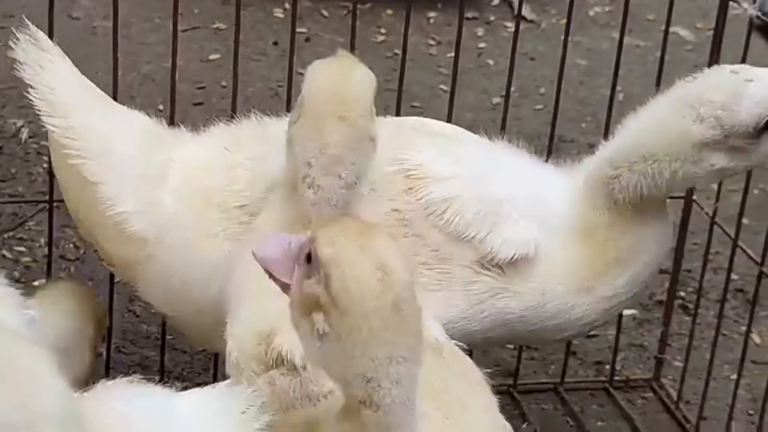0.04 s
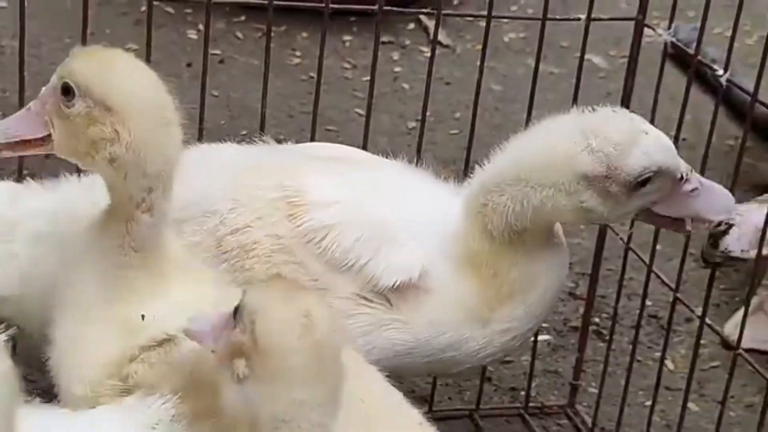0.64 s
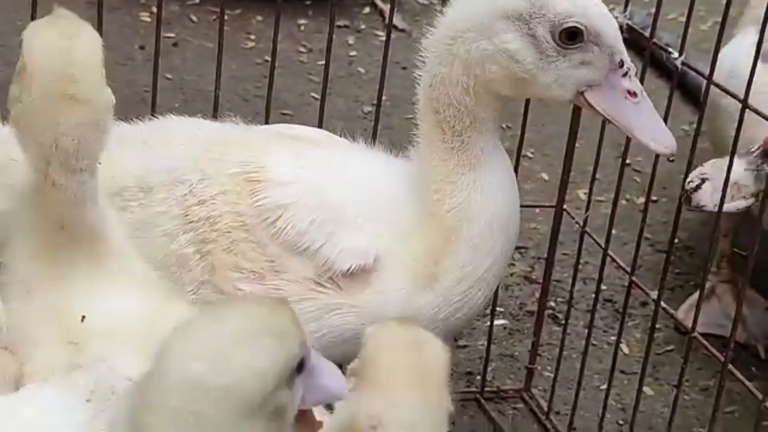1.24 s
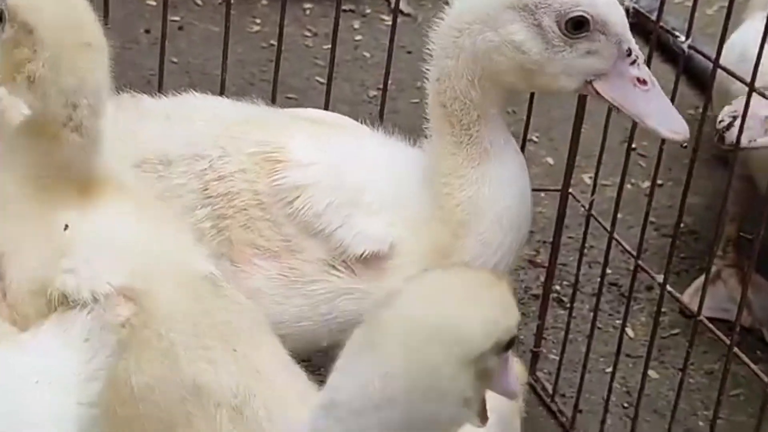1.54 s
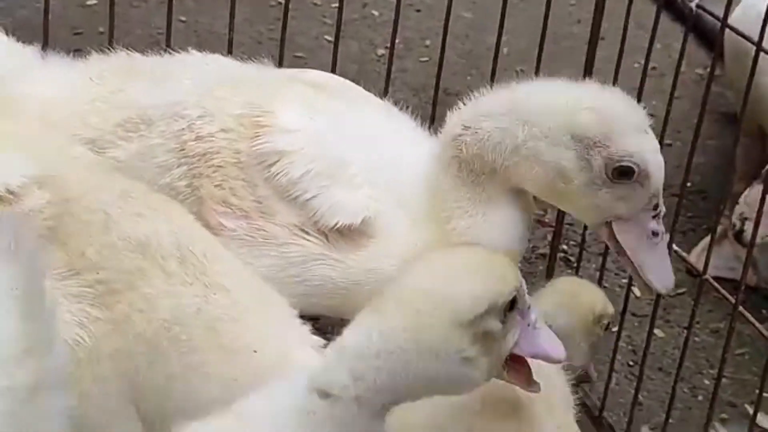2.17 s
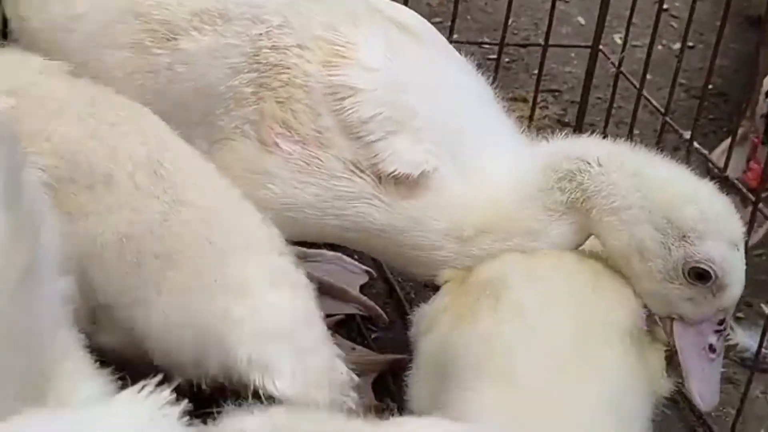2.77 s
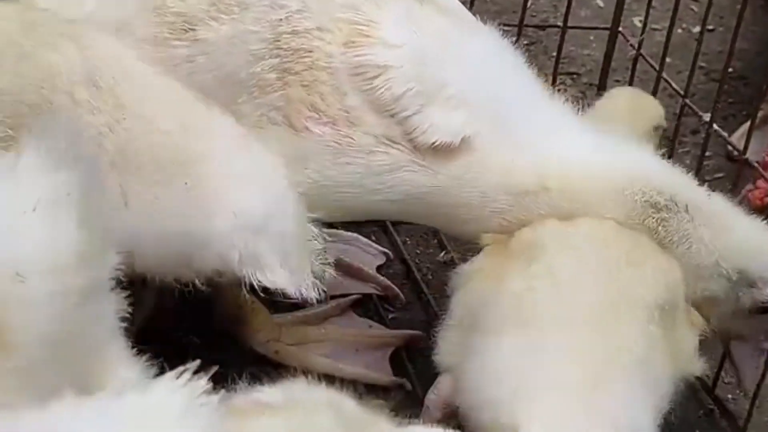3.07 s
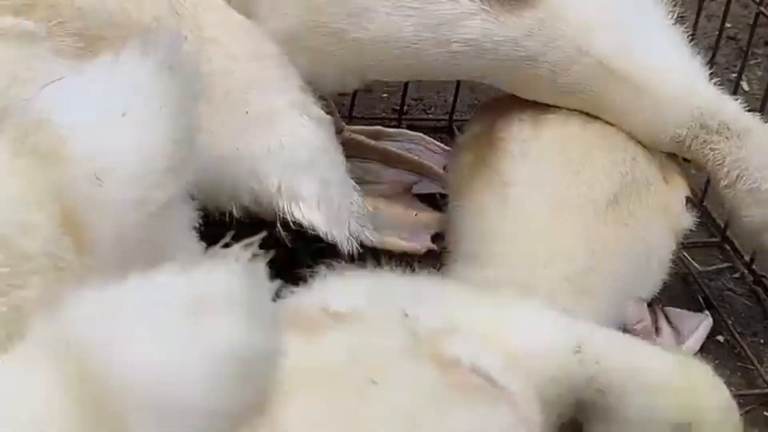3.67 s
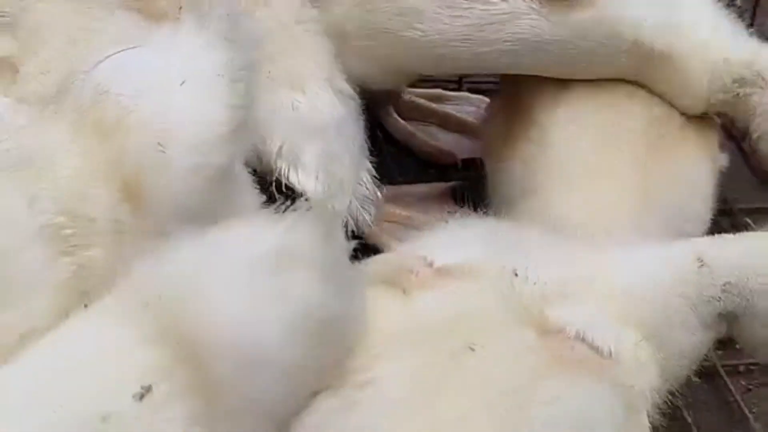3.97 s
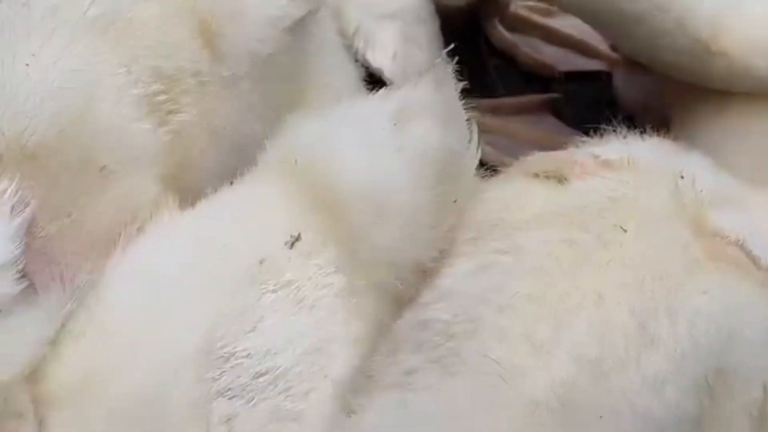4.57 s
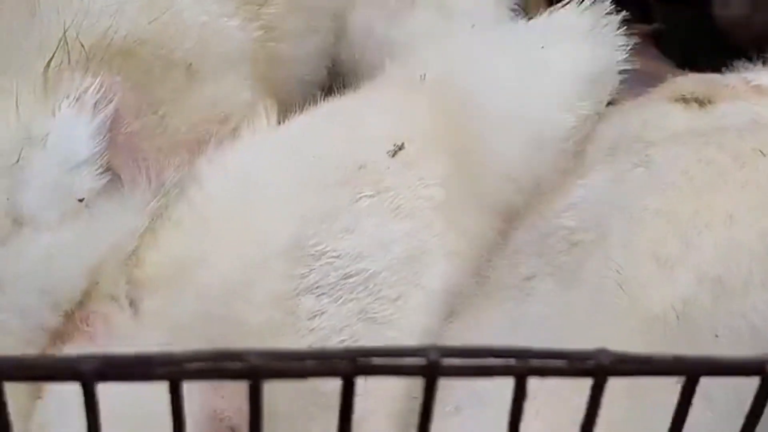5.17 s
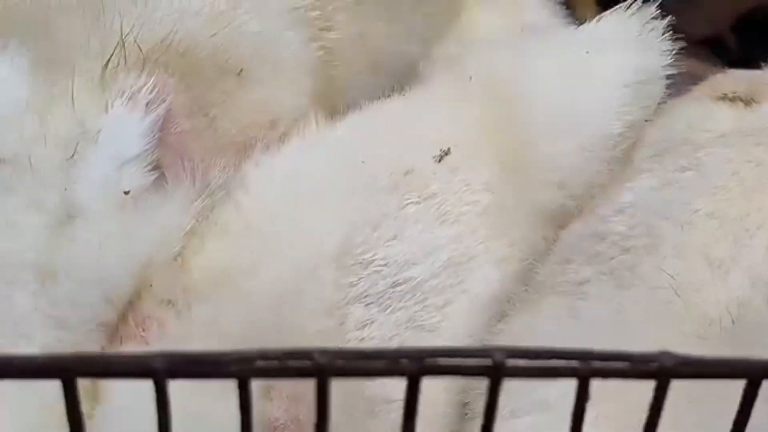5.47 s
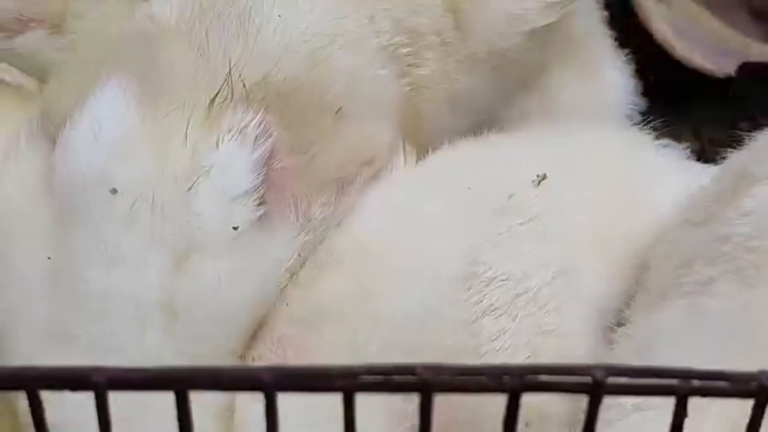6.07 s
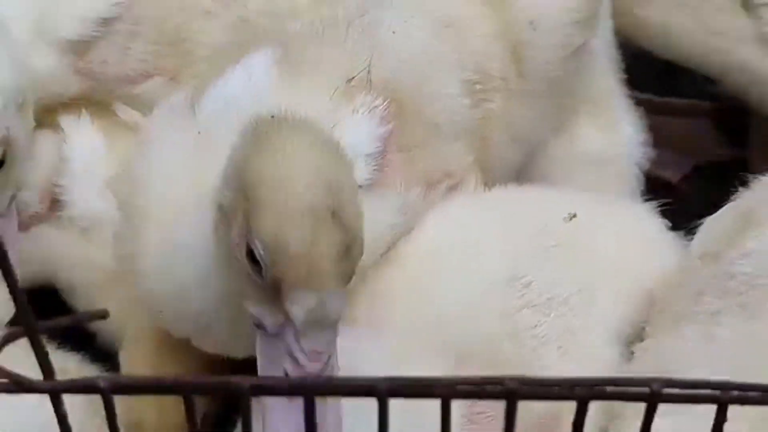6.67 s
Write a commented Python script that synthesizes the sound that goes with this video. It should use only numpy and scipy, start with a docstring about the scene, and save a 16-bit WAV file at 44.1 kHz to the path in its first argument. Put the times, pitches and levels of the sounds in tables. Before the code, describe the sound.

Heard from just above a cage in a yard, young ducklings keep up short, high, overlapping chirps, with sharp peeps standing out near the start and again past the middle. Bills and claws tick on the wires, feathers brush softly, and grown birds coo, cluck and quack quietly. A far chick cheeps through the second half. A distant engine thuds low and swells with a closing quack.

```python
"""A wire cage of ducklings, heard from just above. Soft arched chirps and twitters start at once, over far
chatter, coos, quacks, ticking wires, brushing feathers and the thud of an idling engine. Around 1 s come a
throaty rasp and two loud peeps, each two syrinx membranes beating together; at 2 s, a thin squeal. From 3 s
a far chick cheeps steadily. Around 5 s three more peeps and a rattling squawk burst out, and the scene ends
on a grown duck's quack as the engine swells."""
import sys
import numpy as np
from scipy import signal
from scipy.fft import rfft, irfft, next_fast_len
from scipy.io import wavfile
from scipy.ndimage import uniform_filter1d, minimum_filter1d, map_coordinates

SR = 44100
rng = np.random.default_rng(int(sys.argv[2]) if len(sys.argv) > 2 else 0)


def output_pcm(signal):
    """Save a mono or channel-first signal as 16-bit PCM at the path in sys.argv[1].

    Samples are clipped to [-1, 1] before scaling.
    """
    pcm = np.clip(np.atleast_2d(signal).T, -1, 1) * 32767
    wavfile.write(sys.argv[1], SR, np.round(pcm).astype(np.int16))


N = 305172

TROUGH_HZ = 2390  # a twitter's pitch between notes


def soft_calls(open_db_per_hz=.03, ragged_db=3, wander=.02, split_hz=3200):
    """Near ducklings, as direct sound and echo send; a higher call opens the bill and is brighter."""
    # Single chirps. Each row: start in seconds, length in seconds, top pitch in Hz, level in dB,
    # left over right in dB, roughness 0-1.
    chirp_cues = [(0.161, 0.047, 3160, -29, -1, 0), (.434, 0.055, 2820, -30.5, 1, 0.13),
                  (.476, .042, 3130, -24.5, 1, .2), (.587, .043, 2670, -33, -1, 0.07),
                  (1.034, .046, 2920, -24.5, -2, .12), (1.075, .07, 2560, -26, 1, .2),
                  (1.094, .04, 2960, -26.5, 0, .16), (1.145, .025, 2430, -25, -2, .15),
                  (1.157, 0.035, 2950, -26.5, -2, 0.22), (1.924, .035, 2686, -24, -7.5, .03),
                  (1.971, .031, 2804, -20, -6, .08), (2.183, 0.039, 3060, -34.5, 3, 0.39),
                  (2.45, 0.031, 2585, -37, -4, 0.18), (2.705, .06, 3060, -35, 0.5, 0.05),
                  (3.306, 0.026, 2530, -34, -17, 0.08), (3.579, 0.079, 2396, -37.5, -8, 0.17),
                  (4.197, 0.088, 3250, -34.5, 2, 0.05), (4.75, .044, 2734, -30, 1, 0.43),
                  (4.792, .066, 3316, -28, -4.5, 0.16), (5.056, 0.07, 2930, -36, 4, 0.2),
                  (5.399, 0.073, 2756, -33, 6, 0.6), (5.466, 0.042, 2460, -22, -3, .05),
                  (5.831, .033, 2820, -28, -3, .06), (5.858, 0.065, 3350, -29, -8, 0.13),
                  (6.481, .022, 2660, -36, 1, 0.2)]
    # Runs of slurred notes. Each row: start, length and note spacing in seconds, top pitch in Hz, level
    # in dB, left over right in dB, roughness 0-1, dip between notes in dB, growth over the run in dB.
    twitter_cues = [(-.013, 0.09, .043, 2780, -31, -4, 0.02, 16, -2),
                    (0.689, 0.1, .05, 3036, -27.5, 2.5, 0.34, 5, 9.5),
                    (2.475, .1, .05, 2802, -21.5, -9, 0.05, 3.5, 2.5),
                    (2.745, 0.1, .05, 2790, -41.5, -1, 0.3, -3, -4),
                    (3.619, .145, .044, 2930, -28.5, -6.5, 0.3, 4, -3),
                    (3.953, 0.125, .05, 2700, -31, 2.5, 0.35, 3.5, -2),
                    (5.483, 0.091, .042, 3280, -27, -4, 0.38, 7, -12.5)]
    # Falling whistles. Each row: start and length in seconds, level in dB, left over right in dB,
    # roughness 0-1.
    slide_cues = [(0.124, 0.04, -32.5, -4.5, .2), (0.419, 0.049, -32, -3.5, .12),
                  (0.713, 0.034, -31, -0.5, .24), (1.04, .115, -35.5, -3.5, .4)]
    calls = [chirp(*row) for row in chirp_cues] + [twitter(*row) for row in twitter_cues]
    calls += [slide(*row) for row in slide_cues]
    direct, send = np.zeros((2, 2, N))
    for start, hz, level, pan_db, rough in calls:
        n = len(hz)
        bright_db = -17 + open_db_per_hz * (np.clip(hz.max(), 2700, 3200) - 2700)
        bright_db += np.clip(pan_db, -8, 4)  # the birds on the left face the microphone
        level = level * evened(gain_of(ragged_db * np.sqrt(rough) * wobble(n, 110)))
        hz = hz * (1 + wander * np.sqrt(rough) * wobble(n, 89.6))
        tone = placed(level * (whistle(hz, rough) + gain_of(-21) * rough * breath(n)), pan_db)
        splits = hz.max() > split_hz and hz.min() < TROUGH_HZ  # a wide climb brings out subharmonics
        grit = rasping_edge(hz, rough + .026, half_db=5 if splits else -8, breath_db=-7)
        grit = placed(level * gain_of(bright_db) * grit, pan_db)
        add(direct, start, tone + gain_of(-4) * grit)
        add(send, start, tone * (.35 + 1.97 * rough) + gain_of(-1) * grit)
    return direct, send


def chirp(start, length, top_hz, db, pan_db, rough, rest_hz=1950, skew=1.15, db_per_hz=.008):
    """Curves for one arch of pitch that climbs slowly and drops fast, loudest at the top."""
    u = np.linspace(0, 1, int(length * SR)) ** skew
    hz = rest_hz + (top_hz - rest_hz) * 4 * u * (1 - u)
    level = evened(gain_of(db_per_hz * (hz - top_hz)) * swell(len(u), share=.39))
    return start, hz, gain_of(db) * level, pan_db, rough


def twitter(start, length, note_s, top_hz, db, pan_db, rough, dip_db, growth_db):
    """Curves for a slurred run: pitch and level swing once a note."""
    t = np.arange(int(length * SR)) / SR
    trough = (1 + np.sin(2 * np.pi * t / note_s)) / 2
    level = evened(gain_of(growth_db * t / length - dip_db * trough) * swell(len(t), share=.18))
    return start, top_hz + (TROUGH_HZ - top_hz) * trough, gain_of(db) * level, pan_db, rough


def slide(start, length, db, pan_db, rough):
    """Curves for a short whistle: the high side of the syrinx slides down by itself."""
    hz = arch(length, first=3850, middle=3620, last=3400)
    return start, hz, gain_of(db) * swell(len(hz), share=.33), pan_db, rough


def peeps(scoop_hz=250, drop_hz=810, bend_share=.0837, extra_gap_hz=1000, close_s=.015, high_weight=1.3):
    """Two membranes beat together; sharing one airflow, they make clusters of overtones and sum tones."""
    # Loud peeps. Each row: start and length in seconds; low voice's pitch, its glide and the last gap
    # between voices in Hz; low voice's crest as a share of the length; then in dB the low voice,
    # high voice, left over right, rasp at full voice and upper overtone trim.
    cues = [(0.964, 0.08, 2730, 90, 330, 0.42, -14.5, -24, -6.5, -32, -3),
            (1.212, 0.087, 2720, 230, 430, 0.53, -9.5, -19, -6.5, -25.5, 1),
            (4.668, 0.09, 2750, 40, 340, 0.5, -9, -20, -6, -35, -13),
            (4.9, .08, 2860, -800, 590, 0.52, -15, -17, -6.5, -25, 0),
            (5.336, 0.084, 2860, -300, 340, 0.52, -3.5, -14, -3.5, -37, -11)]
    # Overtones of both voices together. Each row: multiple, level in dB.
    partials = [(2, -24), (3, -31), (4, -37)]
    out = np.zeros((2, N))
    for start, length, pitch, glide, gap, crest_at, low_top, high_top, pan_db, grit_db, trim_db in cues:
        u = np.linspace(0, 1, int(length * SR))
        scoop = scoop_hz * np.exp(-u / bend_share)
        collapse = drop_hz * np.exp((u - 1) / bend_share)  # the air gives out
        low_hz = pitch + glide * (u - .5) - collapse - scoop
        high_hz = low_hz + gap + extra_gap_hz * np.exp(-u * length / close_s)
        low_db = low_top + crest(u, crest_at, rise_db=23, fall_db=22.5)
        high_db = high_top + crest(u, .51, rise_db=20, fall_db=21)
        low = gain_of(low_db) * whistle(low_hz, rough=.06)
        high = gain_of(high_db) * whistle(high_hz, rough=.11)
        strength = np.hypot(gain_of(low_db), high_weight * gain_of(high_db))
        both = signal.hilbert(low + high_weight * high) / strength
        overtones = sum(gain_of(db + trim_db * (k > 2)) * evened((both ** round(k)).real)
                        for k, db in partials)
        grit = gain_of(grit_db + .57 * low_db) * rasping_edge(low_hz, rough=.5, half_db=-2)
        voice = low + high + strength * overtones + grit
        add(out, start, placed(voice, pan_db) * swell(len(u), share=.18))
    return out


def whistle(hz, rough, overtones_db=(), flutter_hz=420, jitter=.1, shimmer=.97):
    """A syrinx membrane: nearly a sine; when rough, its pitch and strength flutter."""
    phase = 2 * np.pi * cycles(hz, jitter * rough, flutter_hz)
    tone = np.sin(phase) + sum(gain_of(db) * np.sin(k * phase) for k, db in enumerate(overtones_db, 2))
    return evened(tone * (1 + shimmer * rough * wobble(len(hz), flutter_hz)))


def rasping_edge(hz, rough, half_db=-6, breath_db=0):
    """The grit on a call: roughness dissolves its overtones into half harmonics and sputtering hiss."""
    # The bill's colour on overtones and breath. Each row: frequency in Hz, gain in dB.
    bill_eq = [(1300, -8), (3000, 7.5), (4600, -3), (5400, -2), (6300, 5), (7200, -2), (8300, -10),
               (10500, -4.5), (15000, -14)]
    # The hiss of a hoarse call. Each row: frequency in Hz, gain in dB.
    hiss_eq = [(2000, -29), (4400, -13), (6000, 6.5), (7500, 1), (10500, -6.5), (15000, -22)]
    n, hoarseness = len(hz), np.sqrt(np.clip(rough, 0, 1))
    phase = 2 * np.pi * cycles(hz, .04 * rough, 600)
    overtones = np.sin(2 * phase) + gain_of(-7) * np.sin(3 * phase) + gain_of(-8) * np.sin(4 * phase)
    halves = evened(gain_of(4) * np.sin(phase / 2) + np.sin(1.5 * phase) + np.sin(2.5 * phase))
    hiss = gain_of(-5) * evened(noise(n, hiss_eq) * gain_of(5.7 * wobble(n, 380)))
    voiced = evened(overtones) * (1 - hoarseness / 4) / np.sqrt(2)
    voiced += hoarseness * gain_of(half_db) * halves
    return body_bounce(colour(voiced + gain_of(breath_db) * breath(n), bill_eq) + hoarseness * hiss)


def breath(n):
    """Air rushing through a small open bill."""
    return evened(noise(n, [(500, -9), (1600, 6.5), (2700, 18.5), (4300, -14), (6000, -11),
                            (8500, -23), (11000, -25), (15000, -7)]))


def rasps():
    """Hoarse pulses ring a duckling's small throat."""
    # Rasps. Each row: start and length in seconds, nominal pulses a second, throat tuning factor,
    # level in dB, roughness 0-1.
    cues = [(.455, 0.059, 520, 0.93, -38.5, 0.53), (.715, 0.11, 380, 0.51, -36, 0.25),
            (2.135, 0.073, 270, 1.1, -48.5, 0.8), (6.098, 0.069, 490, 1.32, -36.5, 0.75)]
    # The small throat's resonances before tuning. Each row: centre in Hz, width in Hz, gain in dB.
    throat = [(1940, 190, -6.5), (3220, 550, 7.5), (3520, 210, 4.5), (6500, 730, -4.5), (9900, 1400, -10)]
    return hoarse_voice(cues, throat)


def hoarse_voice(calls, throat, jitter=.14, puff_share=.3, mouth_shut=.83):
    """Uneven pulses and puffs of air ring a throat, whose resonances rise and fall with the mouth."""
    out = np.zeros(N)
    for start, length, rate, tuning, db, rough in calls:
        hz = rate * arch(length, .86, 1.02, 1)
        n = len(hz)
        turns = cycles(hz, jitter * rough, 150)
        pulses = evened(np.diff(np.floor(turns), prepend=0) - hz / SR)
        puffs = evened(np.exp(-(turns % 1) / puff_share) * rng.standard_normal(n))
        drive = (1 - rough) * pulses + rough * puffs
        voice = np.zeros(n)
        for centre, width, mode_db in throat:
            centre_hz = centre * tuning * arch(length, mouth_shut, 1.02, mouth_shut)
            width_hz = 2 * width * tuning
            voice += gain_of(mode_db) * resonate(resonate(drive, centre_hz, width_hz), centre_hz, width_hz)
        voice = evened(voice * gain_of(2.5 * wobble(n, 40)))
        add(out, start, gain_of(db) * voice * swell(n, share=1))
    return out


def squawk(rattle_hz=300, ring_share=.4, breath_db=-13):
    """A strained voice rich in overtones, chopped by an uneven rattle in the throat."""
    # One squawk: start and length in seconds, top pitch in Hz, level in dB.
    start, length, top_hz, db = (5.09, .118, 835, -26.5)
    # The strained throat's colour. Each row: frequency in Hz, gain in dB.
    throat_eq = [(900, -36), (1700, -12), (2500, -8), (3400, 5), (4300, -12), (7000, -18), (10500, -14),
                 (14000, -33)]
    hz = top_hz * arch(length, .9, 1, .9)
    n, out = len(hz), np.zeros(N)
    phase = 2 * np.pi * cycles(hz, .02, 400)
    rattle = np.exp(-(cycles(np.full(n, rattle_hz), .3, 200) % 1) / ring_share)
    voice = evened(sum(np.cos(k * phase) for k in range(1, 18)))
    voice += gain_of(breath_db) * rng.standard_normal(n)
    add(out, start, gain_of(db) * evened(colour(voice * rattle, throat_eq)) * swell(n, share=.75))
    return out


def squeal():
    """A thin, strained, slowly rising call with a few strong overtones."""
    # One squeal: start and length in seconds, first and last pitch in Hz, level in dB.
    start, length, first_hz, last_hz, db = (2.01, 0.18, 735, 785, -39.5)
    # Its overtones. Each row: multiple, level in dB.
    partials = [(3, 4), (4, 0.5), (6, 1), (8, -5), (11, -20), (13, -15)]
    n, out = int(length * SR), np.zeros(N)
    phase = 2 * np.pi * cycles(np.linspace(first_hz, last_hz, n), .016, 310)
    voice = evened(sum(gain_of(tone_db) * np.sin(round(k) * phase) for k, tone_db in partials))
    add(out, start, gain_of(db + 3 * wobble(n, 60)) * swell(n, share=1) * voice)
    return out


def wire_ticks(knock_s=.007, clatter_db=-9):
    """Bills and claws hit the wires: a bright tick and a short knock."""
    # Hits. Each row: start in seconds, level in dB, knock against tick in dB, brightest frequency in Hz,
    # tick decay in seconds.
    cues = [(.134, -22, -14, 4200, 0.0019), (.601, -39, -26, 10000, 0.0051),
            (1.404, -29.5, -9, 8450, 0.0025), (1.641, -39, -20, 5500, 0.0026),
            (4.132, -39, 8.5, 4500, 0.003), (4.168, -40, -13, 8000, 0.0033), (4.545, -39, 10, 4000, .004),
            (5.944, -39, -15, 8000, .005), (6.062, -34.5, -2, 4000, .003),
            (6.281, -36.5, -25, 4970, 0.0079), (6.448, -33, -14, 10000, 0.0048),
            (6.801, -29, -6, 7600, .005)]
    out, t = np.zeros(N), np.arange(SR // 10) / SR
    for start, db, knock_db, bright_hz, tick_s in cues:
        clatter = noise(len(t), [(800, -35), (2500, .5), (15000, 0)])
        ring = resonate(clatter, np.full(len(t), bright_hz), .58 * bright_hz)
        tick = evened(ring + gain_of(clatter_db) * clatter) * np.exp(-t / tick_s)
        body = noise(len(t), [(200, -30), (500, 3.5), (1100, 3.5), (2500, -24), (8000, -57)])
        knock = gain_of(knock_db) * evened(body) * np.exp(-t / knock_s) / 2
        add(out, start, gain_of(db) * (tick + knock))
    return out


def rustle(scratches_per_s=120, scratch_s=.0048, scratch_db=-61, spread_db=4, grain_db=4):
    """Feet scratch the wires faintly at chance moments; feathers brush them in grainy strokes."""
    # Feather strokes. Each row: start and length in seconds, level in dB.
    strokes = [(1.088, 0.075, -43.5), (2.137, 0.044, -43), (3.38, .16, -54), (5.418, 0.18, -43.5),
               (5.853, 0.085, -46.5), (6.187, 0.06, -47)]
    # Colour of feet and feathers on wire. Each row: frequency in Hz, gain in dB.
    rustle_eq = [(400, -20), (1500, -11), (4000, -6), (7000, 1), (10500, -1.5), (15000, -6.5)]
    sizes = gain_of(spread_db * np.minimum(rng.exponential(1, N), 3))
    scratches = sizes * (rng.random(N) < scratches_per_s / SR)
    decay = np.exp(-1 / (scratch_s * SR))
    level = gain_of(scratch_db) * evened(signal.lfilter([1], [1, -decay], scratches))
    for start, length, db in strokes:
        n = int(length * SR)
        add(level, start, gain_of(db) * evened(swell(n, share=.62) * gain_of(grain_db * wobble(n, 190))))
    return level * evened(noise((2, N), rustle_eq))


def chick_cheeps(length=.1, first_hz=5200, bend=1.8):
    """The far chick's thin whistle starts high, falls fast and levels off."""
    # Cheeps. Each row: start in seconds, last pitch in Hz, level in dB.
    cues = [(1.385, 3850, -35.5), (3.105, 3600, -40), (3.397, 3600, -37), (3.889, 3750, -36),
            (4.215, 3950, -35), (4.791, 3900, -33.5), (5.195, 3800, -36.5), (5.578, 3950, -35),
            (5.864, 3950, -33.5), (6.095, 3950, -33)]
    out, u = np.zeros(N), np.linspace(0, 1, int(length * SR))
    for start, last_hz, db in cues:
        hz = last_hz + (first_hz - last_hz) * (1 - u) ** bend
        add(out, start, gain_of(db) * whistle(hz, rough=.27) * swell(len(hz), share=.8))
    return out


def clucks_and_quacks(cluck_hz=403, quack_hz=190, quack_rough=.8):
    """Grown birds pulse the same kind of big throat: fast for a cluck, slowly for a hoarse quack."""
    # Clucks. Each row: start and length in seconds, throat tuning factor, level in dB, roughness 0-1.
    cluck_cues = [(0.716, 0.082, 1, -47, .38), (2.125, 0.065, 1.44, -44.5, 0.71),
                  (2.2, 0.1, 1.5, -42, 0.65), (4.52, 0.053, 1.12, -35.5, 0.25),
                  (6.027, .045, 1.12, -35.5, 0.07), (6.133, .085, 1.12, -38.5, 0.17)]
    # Quacks. Each row: start and length in seconds, throat tuning factor, level in dB.
    quack_cues = [(-.1, 0.68, 0.63, -56.5), (1.341, 0.29, 0.85, -43.5), (4.41, 0.19, 1.2, -46),
                  (4.519, 0.21, .92, -43.5), (5.6, .25, 0.542, -55.5), (6.695, 0.12, 0.95, -49),
                  (6.81, .13, 1.195, -35.5)]
    # The big throat's resonances before tuning. Each row: centre in Hz, width in Hz, gain in dB.
    throat = [(800, 195, 9), (1205, 159, 6.5), (1493, 116, -4.5), (2480, 320, -13.5)]
    clucks = [(start, length, cluck_hz, *rest) for start, length, *rest in cluck_cues]
    quacks = [(start, length, quack_hz, *rest, quack_rough) for start, length, *rest in quack_cues]
    return hoarse_voice(clucks + quacks, throat)


def coos():
    """Grown birds hoot softly on a shallow arch of pitch."""
    # Coos. Each row: start and length in seconds, nominal pitch in Hz, level in dB.
    cues = [(-.02, 0.098, 1027, -34), (0.449, 0.11, 1023, -36), (2.77, 0.14, 1480, -53),
            (2.928, 0.056, 960, -46), (3.011, 0.046, 984, -44.5), (3.78, 0.077, 1010, -45)]
    out = np.zeros(N)
    for start, length, pitch, db in cues:
        hz = pitch * arch(length, .93, .98, .919)
        voice = whistle(hz, rough=.31, overtones_db=[-26], flutter_hz=130)
        add(out, start, gain_of(db) * voice * swell(len(hz), share=.55))
    return out


def far_flock():
    """Ducklings farther back: bouts of chatter over faint, unbroken peeping."""
    # Bouts. Each row: start and length in seconds, central pitch in Hz, level in dB.
    bouts = [(0.048, .12, 2410, -33.5), (0.198, .14, 2646, -41.5), (.8, 0.18, 2450, -36),
             (1.281, .11, 2743, -32), (1.4, .17, 2556, -41), (1.674, 0.23, 2537, -37),
             (1.989, 0.055, 2150, -38), (2.218, .08, 2393, -41), (2.769, 0.091, 2552, -41.5),
             (3.018, .07, 2696, -39.5), (3.17, .18, 2454, -39), (3.76, .19, 2600, -34.5),
             (4.487, 0.083, 2540, -37), (5.745, .07, 2450, -37.5), (5.909, 0.21, 2438, -39.5),
             (6.195, 0.075, 2700, -36.5), (6.43, 0.17, 2595, -38), (6.6, .15, 2286, -38)]
    out = np.zeros(N)
    add(out, 0, gain_of(-55) * chatter(N / SR, pitch_hz=2500, per_s=20))
    for start, length, pitch_hz, db in bouts:
        add(out, start, gain_of(db - .5) * chatter(length, pitch_hz, per_s=36))
    return out


def chatter(length, pitch_hz, per_s, pitch_spread=.22, spread_db=8):
    """Overlapping little chirps at chance moments, scattered around one pitch."""
    out, count = np.zeros(int((length + .05) * SR)), max(round(length * per_s), 2)
    for k, (late, longer, higher, louder) in enumerate(rng.random((count, 4))):
        hz = pitch_hz * (1 + pitch_spread * (higher - .5)) * arch(.035 + .04 * longer, .88, 1.03, .88)
        voice = whistle(hz, rough=.17) + gain_of(-15) * rasping_edge(hz, rough=.37)
        start = (k + late) / count * (length - .03)
        add(out, start, gain_of(spread_db * louder) * voice * swell(len(hz), share=.6))
    return evened(out)


def engine(firing_hz=17.2, thud_s=.045, smear=.81):
    """A distant engine idles: each firing sends a low thud, smeared on its way."""
    # The engine's fader. Each row: time in seconds, level in dB.
    fader = [(0, -48.5), (4.4, -45.5), (5, -53.5), (6.55, -55), (6.92, -39.5)]
    # Colour of one exhaust thud. Each row: frequency in Hz, gain in dB.
    thud_eq = [(30, -32), (52, -36), (75, -10.5), (105, 3), (130, 1.5), (170, -4), (220, -7), (330, -21.5),
               (700, -62)]
    turns = cycles(np.full(N, firing_hz), .018, 2.4)
    pulses = evened(colour(np.diff(np.floor(turns), prepend=0) - firing_hz / SR, thud_eq))
    puffs = evened(colour(np.exp(-(turns % 1) / firing_hz / thud_s) * rng.standard_normal(N), thud_eq))
    level = gain_of(np.interp(np.arange(N) / SR, *np.transpose(fader)))
    return evened((1 - smear) * pulses + smear * puffs) * level


def yard_air(db=-46.5):
    """Steady outdoor noise, more alike left and right in the bass."""
    # Colour of the yard's noise bed. Each row: frequency in Hz, gain in dB.
    air_eq = [(8, -11), (28, -9.5), (50, -4), (110, 2.5), (220, -5.5), (400, -12.5), (1000, -12.5),
              (1700, -15), (4800, -14), (7000, -20.5), (10000, -21), (15000, -18)]
    common = noise(N, [(25, 2.5), (100, 5), (500, 2), (2000, -18), (8000, -51)])
    own = rng.standard_normal((2, N))
    mixed = colour(own + common, [(25, 6.5), (100, -6), (500, -3.5), (2000, -.5), (8000, -6)])
    return gain_of(db) * evened(colour(mixed, air_eq))


def echoes(x, near_db, tail_db, near_s=.02, near_per_s=1500):
    """Quick reflections from floor and bodies, then the yard's tail; different on each side."""
    # The yard's reverb. Each row: frequency in Hz, seconds to fall by 60 dB.
    decay_times = [(200, 0.77), (1000, 0.33), (3000, 0.37), (6000, 0.25), (14000, 0.35)]
    taps, grid = np.zeros((2, SR)), np.arange(400, SR - 20, 20)
    at = grid + rng.integers(0, 20, (2, len(grid)))
    np.put_along_axis(taps, at, rng.choice([-1., 1.], at.shape), 1)
    hz, t, spectra = signal.stft(taps, SR, nperseg=256)
    fade = gain_of(-60 * t / curve_at(decay_times, hz)[:, None])
    tail = signal.istft(spectra * fade, SR, nperseg=256)[1][:, :SR]
    age = np.arange(SR) / SR
    near = rng.standard_normal((2, SR)) * (rng.random((2, SR)) < near_per_s / SR)
    near *= np.exp(-2 * age / near_s) * (age > .002)
    response = sum(gain_of(db) * part / np.linalg.norm(part, axis=1, keepdims=True)
                   for db, part in [(near_db, near), (tail_db, tail)])
    return signal.fftconvolve(np.atleast_2d(x), response, axes=1)[:, :N]


def body_bounce(x, strength=.8, latest_s=.0022):
    """A bounce off a neighbouring body combs the treble, differently for each call."""
    lag = int(latest_s * rng.uniform(.35, 1) * SR)
    return (x + strength * np.pad(x, (lag, 0))[:len(x)]) / np.hypot(1, strength)


def placed(x, pan_db, left_lead_s=5e-5):
    """Pans a near bird by level; sound from the cage reaches the left microphone port first."""
    at, lag = np.arange(len(x)), left_lead_s * SR / 2
    pair = np.array([map_coordinates(x, [at + side * lag], order=5) for side in (1, -1)])
    return evened(gain_of([[pan_db / 2], [-pan_db / 2]])) * pair


def arch(length, first, middle, last):
    """A parabola through three points, lasting `length` seconds."""
    shape = np.polyfit([0, .5, 1], [first, middle, last], 2)
    return np.polyval(shape, np.linspace(0, 1, int(length * SR)))


def swell(n, share):
    """Soft fades in and out that together take a share of the call; rms 1."""
    return evened(signal.windows.tukey(n, share))


def crest(u, at, rise_db, fall_db, curve=1.5):
    """Level in dB that climbs to 0 at share `at` of a call and sinks again."""
    before, after = np.maximum(1 - u / at, 0), np.maximum((u - at) / (1 - at), 0)
    return -rise_db * before ** curve - fall_db * after ** curve


def cycles(hz, jitter, flutter_hz):
    """Running count of cycles for a pitch that wavers by the share `jitter`."""
    return np.cumsum(hz * (1 + jitter * wobble(len(hz), flutter_hz))) / SR


def wobble(n, hz):
    """Smooth random motion of rms 1, up to about hz changes a second."""
    f = np.fft.rfftfreq(next_fast_len(n + 4096), 1 / SR)
    return evened(irfft(rfft(rng.standard_normal(2 * len(f) - 2)) * np.exp(-(f / hz) ** 2)))[:n]


def resonate(x, hz, width_hz):
    """A resonance of gain 1 that follows the curve hz."""
    turn, pole = np.exp(2j * np.pi * np.cumsum(hz) / SR), np.exp(-np.pi * width_hz / SR)
    return 2 * (turn * signal.lfilter([1 - pole], [1, -pole], x / turn)).real


def noise(shape, eq):
    """White noise through an EQ curve of (Hz, dB)."""
    return colour(rng.standard_normal(shape), eq)


def colour(x, eq):
    """Filters by an EQ curve of (Hz, dB)."""
    n = x.shape[-1]
    return irfft(rfft(x) * gain_of(curve_at(eq, np.fft.rfftfreq(n, 1 / SR))), n)


def curve_at(points, hz):
    """Reads a curve of (Hz, value) on a log-frequency axis."""
    f, value = np.transpose(points)
    return np.interp(np.log(hz + 1), np.log(f + 1), value)


def add(mix, start, sound):
    """Mixes a sound in at `start` seconds."""
    at = round(start * SR)
    sound = sound[..., max(-at, 0):]
    part = mix[..., max(at, 0):][..., :sound.shape[-1]]
    part += sound[..., :part.shape[-1]]


def gain_of(db):
    """Decibels to a factor."""
    return 10 ** (np.asarray(db) / 20)


def evened(x):
    """Scales to rms 1."""
    return x / np.sqrt(np.mean(abs(x) ** 2) + 1e-20)


def scene():
    """The mix: near chirps and peeps are mostly dry, far birds mostly echo."""
    soft, soft_send = soft_calls()
    loud, wires = peeps(), wire_ticks()
    strained = placed(rasps() + squawk(), pan_db=-4.5) + squeal()
    grown, chick = clucks_and_quacks() + coos(), chick_cheeps()
    flock = gain_of([[-2.5], [2.5]]) * far_flock()  # off to the right
    cage_send = soft_send + gain_of(-3.5) * loud + gain_of(2) * strained + gain_of(-1.5) * wires
    return (soft + loud + strained + wires + rustle() + echoes(cage_send, near_db=0, tail_db=-13.5)
            + gain_of(2) * grown + echoes(grown, near_db=3.5, tail_db=-11)
            + gain_of(-5.5) * chick + echoes(chick, near_db=-3, tail_db=-6.5)
            + gain_of(-4) * flock + echoes(flock, near_db=-2, tail_db=-7)
            + engine() + yard_air())


def record(dry, ceiling=.97, cutoff_hz=15450):
    """Each microphone port colours the treble; a quick limiter holds the peaks; a low-pass follows."""
    # The left port's colour. Each row: frequency in Hz, gain in dB.
    left_eq = [(5000, -2), (6400, 1), (7500, -1.5), (8600, -14), (11000, -12.5), (14000, -14.5)]
    # The right port's colour. Each row: frequency in Hz, gain in dB.
    right_eq = [(5600, -1.5), (7000, -14), (8300, 2.5), (8900, -15), (10100, 0), (12500, -9.5),
                (14000, -15)]
    ports = np.array([colour(dry[0], left_eq), colour(dry[1], right_eq)])
    allowed = np.minimum(1, ceiling / (abs(ports).max(0) + 1e-9))
    limited = ports * uniform_filter1d(minimum_filter1d(allowed, size=301), size=201)
    lowpass = signal.firwin(511, cutoff_hz, window=("kaiser", 9), fs=SR)
    return signal.oaconvolve(limited, lowpass[None], "same")


dry = scene()
out = record(dry)
output_pcm(out)
```